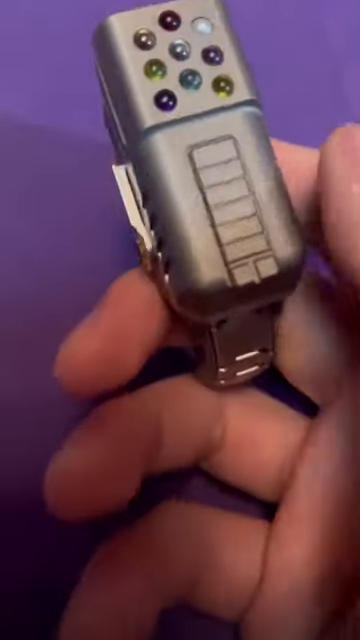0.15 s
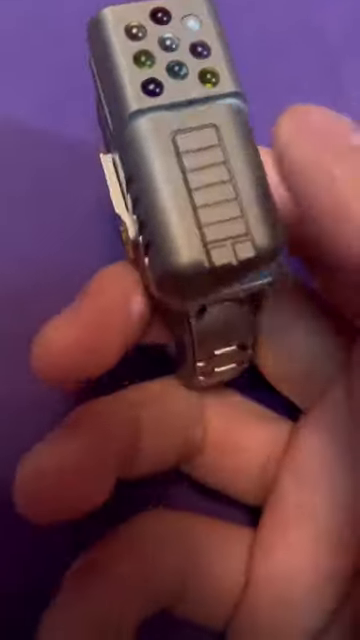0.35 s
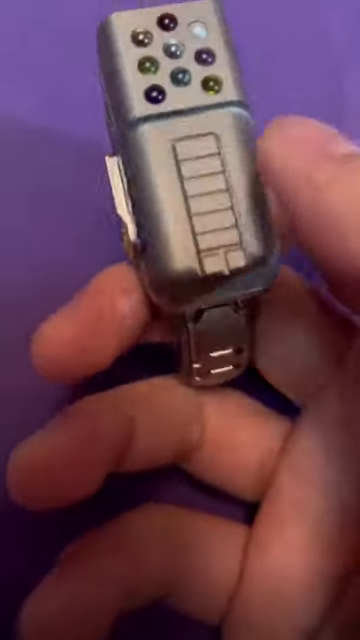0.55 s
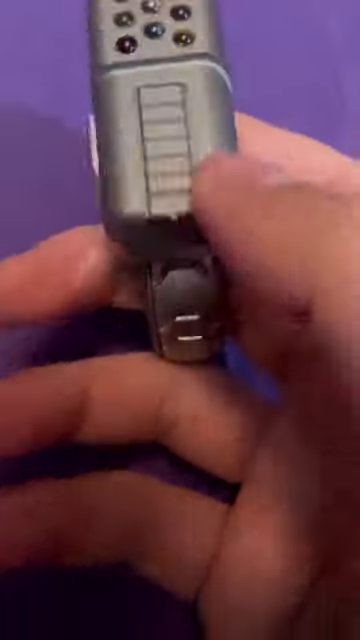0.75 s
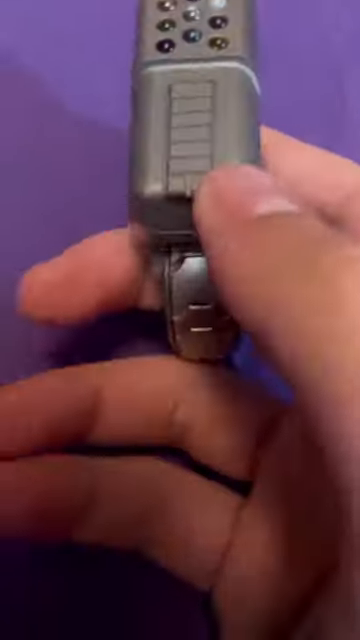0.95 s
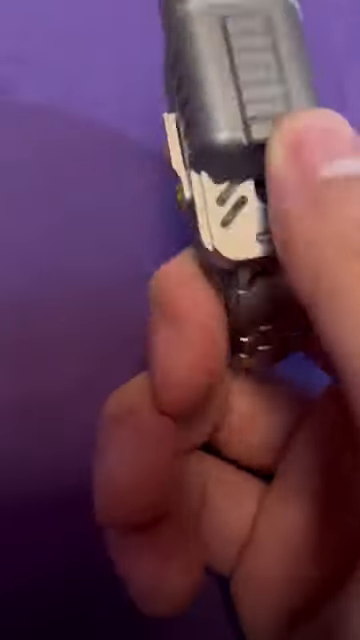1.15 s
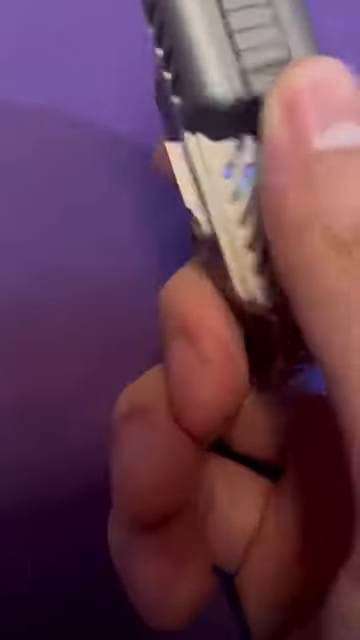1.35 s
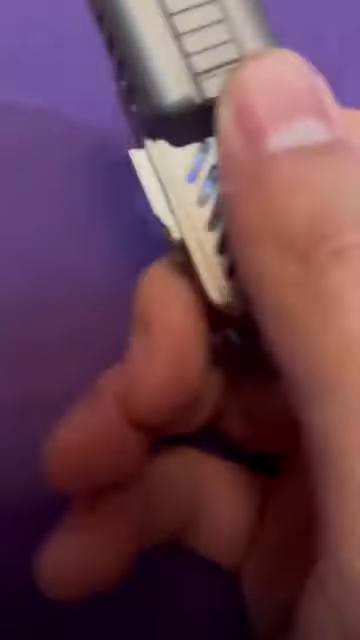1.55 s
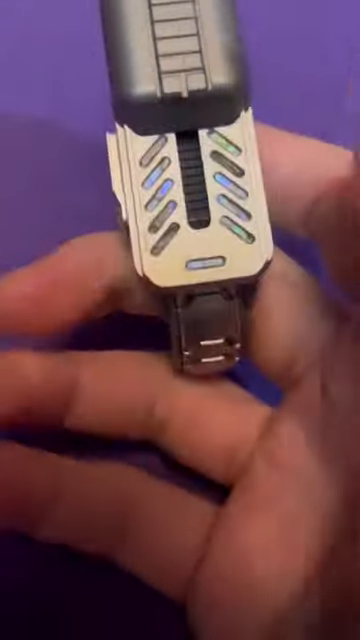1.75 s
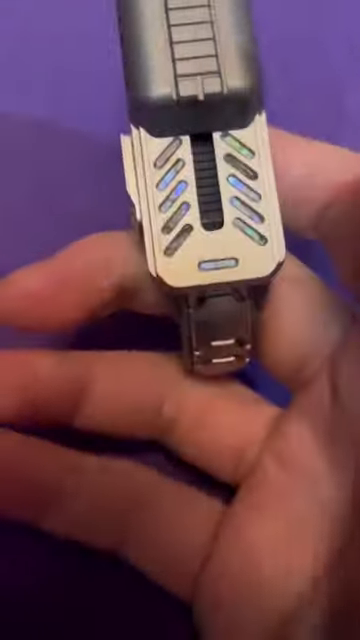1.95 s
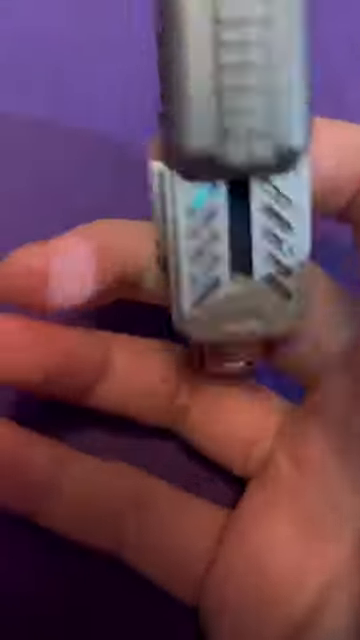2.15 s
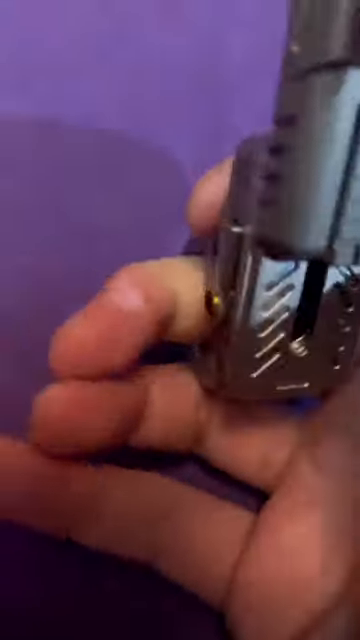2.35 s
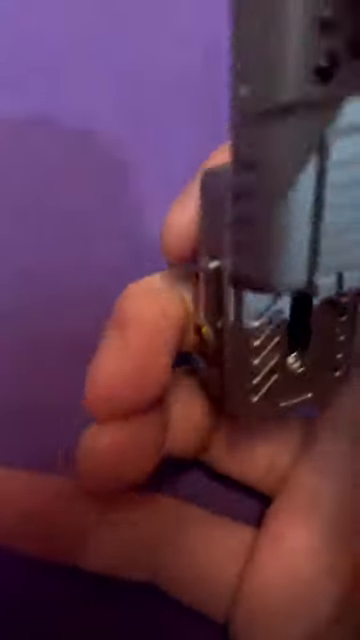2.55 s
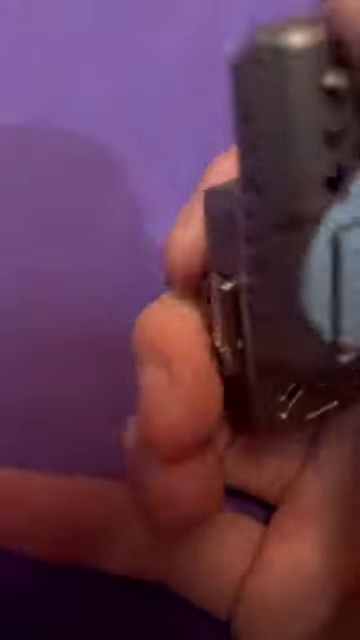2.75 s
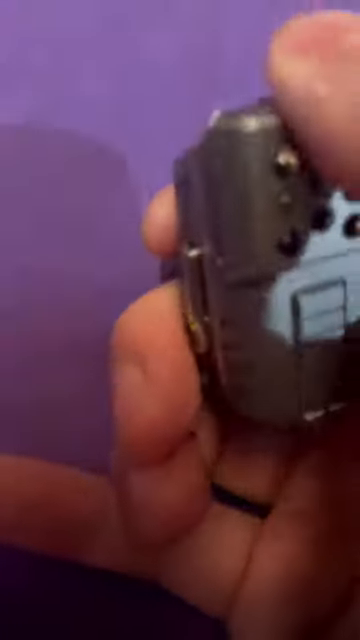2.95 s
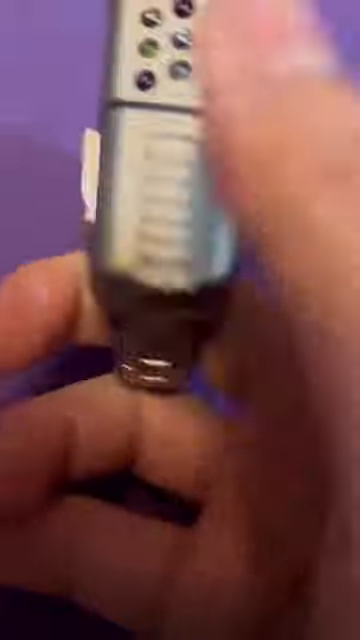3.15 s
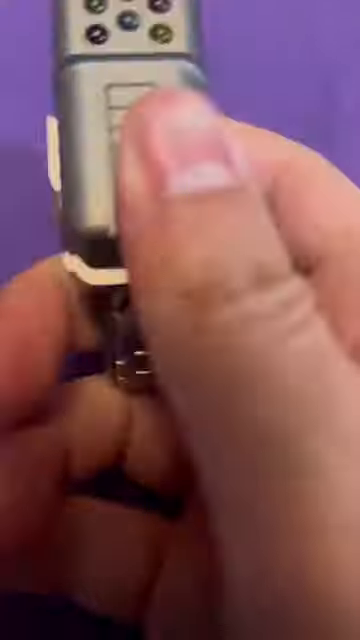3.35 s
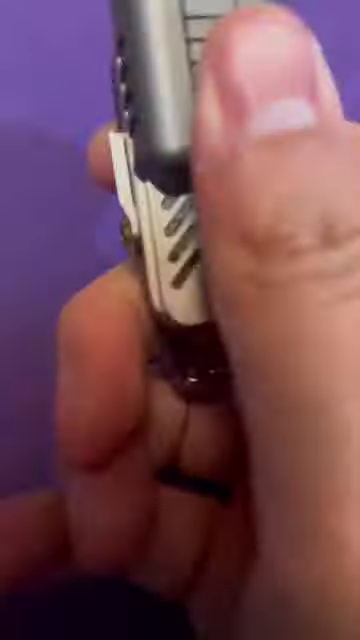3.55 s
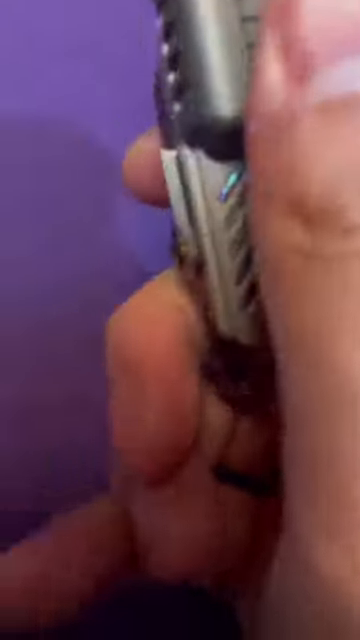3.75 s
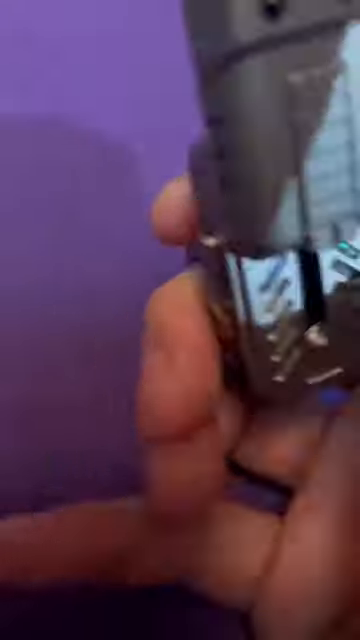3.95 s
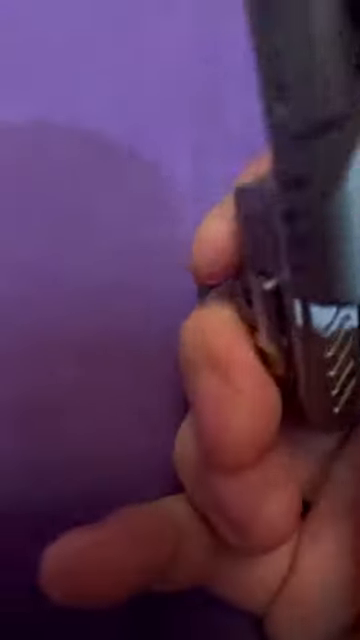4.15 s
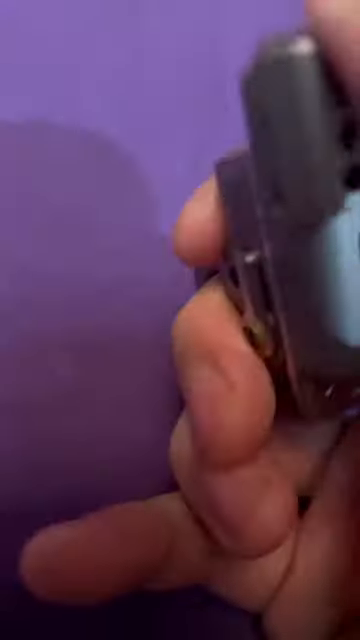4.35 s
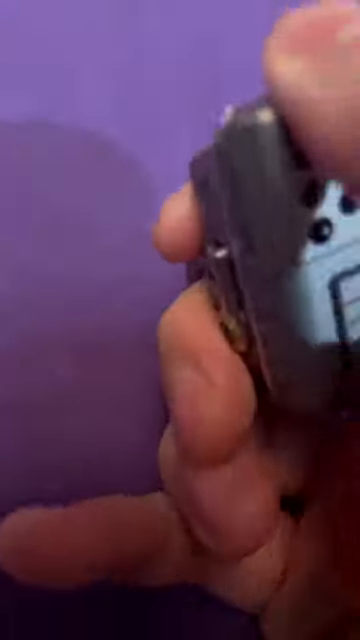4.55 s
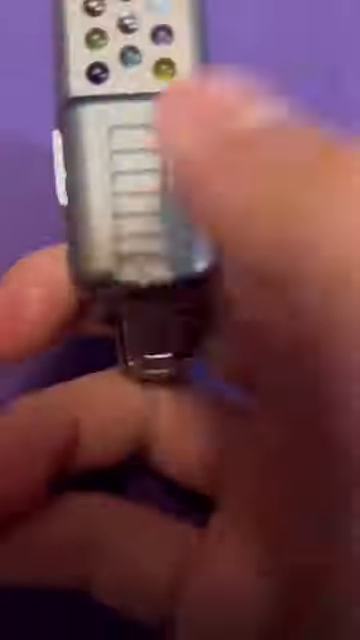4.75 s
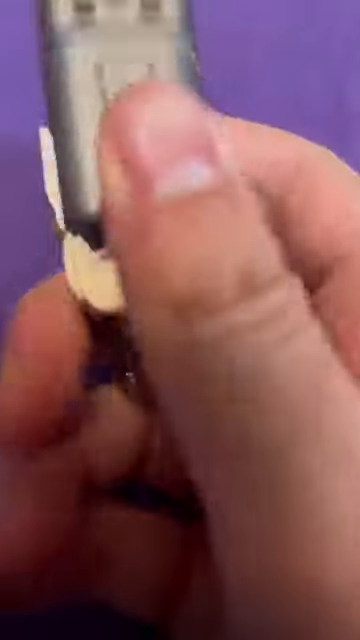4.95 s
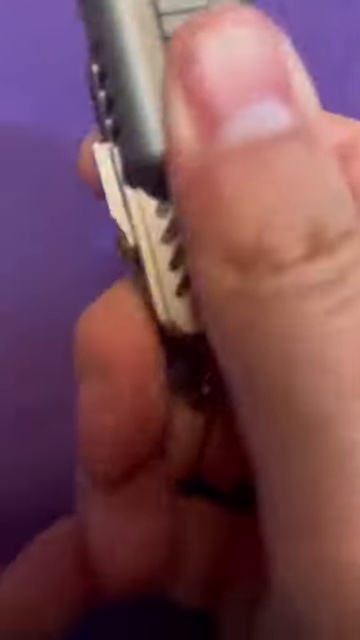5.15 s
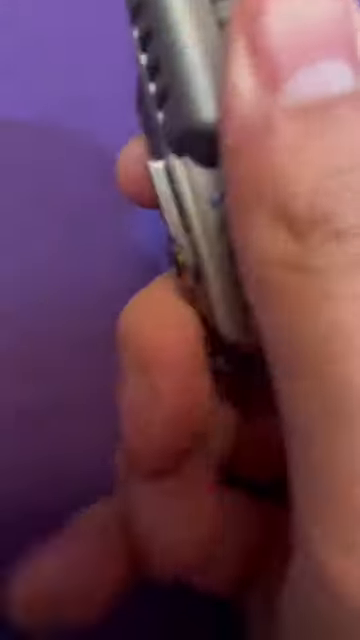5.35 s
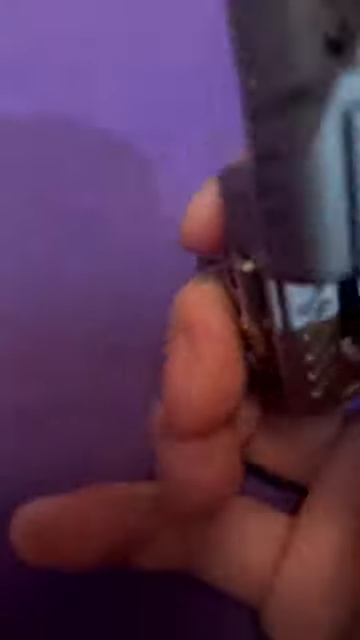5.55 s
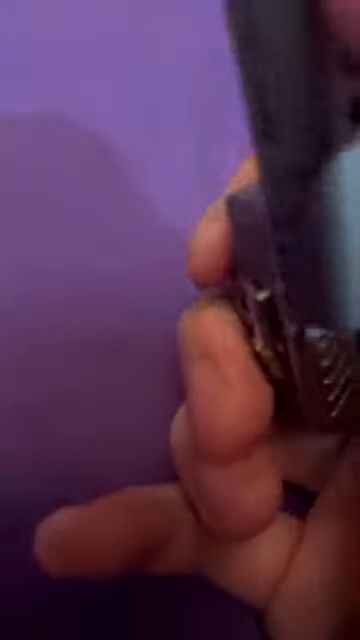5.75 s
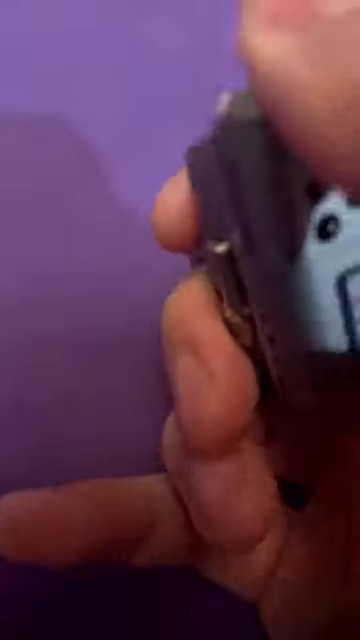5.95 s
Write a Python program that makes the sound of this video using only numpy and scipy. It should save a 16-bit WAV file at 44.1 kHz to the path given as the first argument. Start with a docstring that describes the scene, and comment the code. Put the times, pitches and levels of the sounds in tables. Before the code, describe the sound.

A quiet small room with very faint low airy noise and a wavering appliance hum; the close microphone catches only a barely audible skin rub at first. From about 1.3 s a loose tick leads into two sharp metal snaps almost together at 1.45 and 1.48, and a third at 1.67. Each is a tiny click, a few milliseconds of scrape, a bright hard crack and a duller clack, with a brief high metallic ring and low hand thud. The background dips near 2.2 s; only faint rubs and ticks follow until 3 s. Then triple snaps come at 3.06, 3.11 and 3.18; 3.71, 3.83 and 3.98; 4.55, 4.64 and 4.76; 5.28, 5.38 and 5.54. Lighter ticks scatter between, notably near 3.14, 4.41 and 5.21, with a soft low bump around 4.86. After the last snap, short ringing fades to near silence by 6 s.

```python
"""Metal fidget slider

A metal fidget slider is thumbed open and shut close by in a small, quiet room: five strokes of three notches.
At each notch filtered bursts of tiny impacts make a click, a scrape, a bright crack and a duller clack.
Fading sine waves ring the shell and cover, and low rumbles and bumps give the hand's jolts.
Loose parts tick, skin rubs as soft hiss, short noise tails answer as the room, and an appliance hums behind."""
import sys
import numpy as np
from scipy import signal
from scipy.fft import rfft, irfft, next_fast_len
from scipy.io import wavfile
from scipy.ndimage import map_coordinates

SR = 44100
rng = np.random.default_rng(int(sys.argv[2]) if len(sys.argv) > 2 else 0)


def dump_mix(stems):
    """Bounce the given channels to the path in sys.argv[1] as a 16-bit WAV at rate SR."""
    frames = np.atleast_2d(stems).T  # one column per channel
    limited = np.clip(frames, -1, 1)  # hard clip at full scale
    pcm = np.round(limited * 32767).astype(np.int16)
    wavfile.write(sys.argv[1], SR, pcm)


N = 264159

# Overall course of the background. Each row: time in seconds, guiding level in dB.
BACKGROUND_LEVEL = [(0, -62), (1.2, -61.5), (2.05, -64), (2.22, -70.5), (2.42, -69), (2.6, -63.5),
                    (4.5, -63), (5.99, -63.5)]
# Tone of the airy noise. Each row: frequency in Hz, relative strength in dB.
AIR_TONE = [(15, -51), (25, -17), (69, -8.5), (95, -4.5), (115, -5), (131, -19.5), (163, -11.5),
            (326, -12.5), (501, -7), (655, -24.5), (1760, -30.5), (4150, -38.5), (5420, -48),
            (10300, -50.5), (15000, -61.5)]
# Steady notes of the appliance. Each row: frequency in Hz, level in dB relative to the airy noise.
HUM_LINES = [(103, 0), (165, -10.5), (305, -9), (462, -6), (483, -11), (508, -5.5)]
# Skin sliding on the shell. Each row: middle in seconds, time from the middle until the swell falls to
# about a third in seconds, level before the swell in dB, centre of the hiss in Hz, its width in Hz.
SKIN_RUBS = [(0.48, .05, -82, 8500, 6000), (1.24, .085, -73, 6000, 3400), (1.27, .105, -70, 4200, 1000),
             (1.32, .14, -71, 2198, 900), (2.49, 0.036, -71.5, 9840, 4500), (2.6, .11, -75, 3400, 600),
             (2.867, 0.017, -68.5, 8450, 7150), (3.045, .01, -61, 8000, 7070),
             (3.41, .015, -65, 8980, 6820), (4.289, .02, -75, 9800, 3500), (4.49, .042, -72.5, 2300, 1530),
             (5.256, 0.01, -59, 2250, 887), (5.797, 0.12, -80.5, 9020, 7000)]
# Tone of the room's answer. Each row: frequency in Hz, relative strength in dB.
ECHO_TONE = [(200, -5), (1000, 11), (2500, 6), (5000, 2.5), (7200, -3), (9300, -0.5), (10300, -8.5),
             (15000, -1.5)]
# How long the room lingers. Each row: frequency in Hz, time to fall by 60 dB in seconds.
ROOM_DECAY = [(200, 0.31), (2000, 0.09), (6000, 0.22), (9500, 0.22), (10600, .22), (15000, 0.15)]
# Loose parts nudged by the fingers. Each row: start in seconds, crack level in dB, knock level in dB.
LOOSE_TICKS = [(1.3357, -42.5, -46.5), (1.3976, -57.5, -47.5), (1.585, -46, -47.5), (2.397, -80, -63),
               (2.716, -62.5, -82), (2.942, -64.5, -87), (2.9893, -46, -46.5), (3.1446, -35, -33),
               (3.3926, -64, -84), (3.6168, -64, -52), (3.6312, -50, -45.5), (3.6427, -45, -43.5),
               (3.7999, -52, -42), (3.847, -49.5, -43), (4.2025, -57, -46), (4.3784, -55, -72.5),
               (4.4119, -35, -42), (4.5636, -36.5, -41.5), (4.6466, -40, -41), (4.6879, -50.5, -49),
               (4.9822, -70, -54.5), (5.1871, -64, -50.5), (5.2082, -43.5, -32), (5.218, -46, -44),
               (5.9344, -66.5, -78.5)]
# Tone of two metal faces meeting. Each row: frequency in Hz, relative strength in dB.
CRACK_TONE = [(150, -17), (600, -16), (1100, -10.5), (1700, -2.5), (2650, -3.5), (3000, -4.5), (4800, 1.5),
              (6200, 3), (7300, 1), (10700, 2), (12400, 1), (15300, -4.5)]
# Damping of a light touch and of a hard blow. Each row: crack level in dB, knock width in Hz, ping width in Hz.
TOUCH_DAMPING = [(-48, 560, 1000), (-19.5, 850, 2000)]
# One snap per notch, three to a stroke. Each row: release, catch and landing in seconds,
# release, catch and landing levels in dB, extra knock and clunk in dB.
SNAP_EVENTS = [(1.4452, 1.451, 1.4618, -24, -18.5, -27, -6), (1.47, 1.4815, 1.487, -28.5, -19, -30, -4),
               (1.6594, 1.665, 1.6712, -33, -20.5, -24.5, -5.5),
               (3.0497, 3.0594, 3.0622, -28.5, -20.5, -26, 1),
               (3.106, 3.1123, 3.1142, -37.5, -19.5, -22, 0.5), (3.1689, 3.177, 3.1817, -31.5, -19, -20, 1),
               (3.704, 3.7106, 3.7207, -28.5, -19.5, -29, 2.5),
               (3.8212, 3.8275, 3.8312, -40, -21, -30, 1.5), (3.9712, 3.9777, 3.9838, -32.5, -21.5, -20, 2),
               (4.543, 4.551, 4.555, -34, -20, -28, -0.5), (4.629, 4.639, 4.641, -35, -20.5, -26.5, 0),
               (4.749, 4.7557, 4.7612, -36, -22, -18.5, -1), (5.274, 5.278, 5.2898, -26.5, -18, -25.5, 0.5),
               (5.371, 5.375, 5.384, -30.5, -19.5, -36, 0.5),
               (5.5382, 5.5435, 5.5493, -28.5, -18.5, -21, 0.5)]
# The notches in the order they are met, three outward and three homeward; the third and sixth are end stops.
# Each row: hollow knock in Hz, knock in the release, catch and landing relative to their cracks in dB,
# length of the scrape in seconds, scrape relative to the catch in dB, then the frame clunk, shell ring,
# cover ring and hand thud in dB.
NOTCH_SOUNDS = [(2320, -16, -10, 1.5, .006, -1.5, -43, -52, -41, -67),
                (2420, -11, -9, -3, .009, -3, -54, -51, -41, -64),
                (2430, -13, -19.5, -4, 0.0044, -6, -42, -37, -41, -56),
                (2100, 2, -11, -3, 0.0031, -1, -49, -48, -41, -58),
                (2150, -2.5, -6, -4.5, .003, 0, -52, -49, -45, -60),
                (2240, -3, -7, -4, 0.0039, -5, -54, -45, -56, -57)]
# Tone of the sliding cover. Each row: frequency in Hz, relative strength in dB.
SCRAPE_TONE = [(300, -29.5), (1000, -18.5), (2200, -3), (3300, -4), (5000, -12), (6200, 3.5), (7200, -8),
               (8800, 1), (10300, -3.5), (12000, -6.5), (15200, -7)]
# Lasting notes of the shell. Each row: frequency in Hz before a small random shift, relative level in dB
# before a random change, time to fall by 60 dB in seconds.
SHELL_NOTES = [(1590, -7, 0.055), (3310, -11.5, 0.14), (4450, -10, 0.15), (5610, -7.5, 0.055),
               (6800, -12, 0.16), (7770, -9.5, 0.14), (8900, -14, .14), (9200, -10, 0.11), (9550, -11, .17),
               (11600, -14.5, .09)]
# Tone of the jolted hand. Each row: frequency in Hz, relative strength in dB.
THUD_TONE = [(25, -18.5), (60, 1), (90, -5.5), (130, -13.5), (300, -20), (700, -42.5), (2000, -77.5)]
# Soft bumps of the hand. Each row: middle in seconds, time from the middle until the swell falls to
# about a third in seconds, level in dB, pitch in Hz.
HAND_BUMPS = [(1.729, 0.026, -49, 77.2), (3.018, 0.027, -48.5, 55.5), (4.862, 0.029, -39, 64.1),
              (4.984, 0.035, -51.5, 62.9), (5.633, 0.027, -54, 65.6)]

# How each contact sounds: treble tilt in dB, ping relative to the crack in dB, length of the chatter in seconds
TICK = dict(tilt_db=-11, ping_db=-2, chatter=.002)
RELEASE = dict(tilt_db=5.2, ping_db=0, chatter=.0021)
CATCH = dict(tilt_db=9, ping_db=-2.5, chatter=.0025)
LANDING = dict(tilt_db=-11.5, ping_db=-1, chatter=.0027)

# Every name ending in T60 is a time in seconds to change by 60 dB.
TICK_KNOCK_HZ = 2150
PING_HZ = 9000  # the plate's high ping, before a small random shift
FULL_RING_DB = -26  # a tick of this strength would ring the cover as hard as a landing does
COVER_HZ, COVER_T60 = 2664, .092  # the cover's bending note
LEAD_IN_DB, LEAD_IN_T60 = -25.5, .045  # lead-in level relative to the scrape's peak, and its rise
SWELL_DB_PER_S, SCRAPE_T60 = 700, 0.01  # the scrape's rise towards the catch and its fall after it
CLUNK_HZ, CLUNK_WIDTH_HZ, CLUNK_T60 = 1080, 550, .012  # the whole frame takes the landing
RATTLE_DB, RATTLE_T60 = -1, .13  # loose inner parts: level relative to the shell's ring, and decay
TOP_HZ = 15650  # the treble ends here


def amp(db):
    """Turn decibels into a gain."""
    return 10 ** (np.asarray(db) / 20)


def unit(x):
    """Scale a sound to an average (rms) level of 1."""
    return x / np.sqrt(np.mean(x ** 2) + 1e-20)


def burst(x):
    """Scale a short sound to the energy of 3 ms at an average (rms) level of 1."""
    return x * np.sqrt(.003 * SR / (np.sum(x ** 2) + 1e-20))


def along(points, hz):
    """Read a curve of (Hz, value) points, joined by straight lines over a log frequency axis."""
    f, value = np.transpose(points)
    return np.interp(np.log(hz + 1), np.log(f + 1), value)


def tone(points):
    """Make a gain curve in dB from a table of (Hz, dB) points."""
    return lambda hz: along(points, hz)


def resonance(centre_hz, width_hz):
    """Make the gain curve in dB of a steep-sided resonance."""
    def gain_db(f):
        distance = (f * f - centre_hz ** 2) / ((f + 1) * width_hz)
        return -20 * np.log10(1 + distance ** 2)
    return gain_db


def coloured(x, gain_db):
    """Filter a sound with a gain curve in dB, so that nothing is heard before its cause."""
    n = x.shape[-1]
    m = 2 * next_fast_len(n)
    gain = np.maximum(amp(gain_db(np.fft.rfftfreq(m, 1 / SR))), 1e-6)
    # folding the cepstrum onto its first half gives the filter its earliest possible response
    cepstrum = irfft(np.log(gain), m)
    cepstrum[1:m // 2] *= 2
    cepstrum[m // 2 + 1:] = 0
    response = np.exp(rfft(cepstrum))
    return irfft(rfft(x, m) * response, m)[..., :n]


def wobble(rate):
    """Draw a smooth random curve through `rate` random points a second."""
    points = rng.standard_normal(int(N * rate / SR) + 4)
    return map_coordinates(points, [np.arange(N) * rate / SR])


def grit(envelope, spiky_db):
    """Make a hail of tiny impacts of uneven size that follows an envelope."""
    sign, size = rng.standard_normal((2, len(envelope)))
    return envelope * sign * amp(spiky_db * size)


def add(track, s, x):
    """Mix x into the track at s seconds."""
    i = max(round(s * SR), 0)
    track[i:i + len(x)] += x[:max(N - i, 0)]


def hum_line(hz, t):
    """One note of the appliance, wavering in strength and phase."""
    strength = amp(3 * wobble(7))
    return strength * np.sin(2 * np.pi * hz * t + 1.2 * wobble(10))


def background():
    """Low airy noise and the wavering hum of an appliance; both sink for a moment."""
    t = np.arange(N) / SR
    level_db = np.interp(t, *np.transpose(BACKGROUND_LEVEL))
    usual_db = np.median(level_db)
    swing_db = level_db - usual_db

    mid, side = unit(coloured(rng.standard_normal((2, N)), tone(AIR_TONE)))
    air = np.array([mid + amp(-28.5) * side, mid - amp(-27) * side])
    body = signal.sosfiltfilt(signal.butter(2, 700, fs=SR, output="sos"), air)
    hiss = air - body
    hum = sum(amp(db) * hum_line(hz, t) for hz, db in HUM_LINES)

    # the low body and hum swing further than the faint hiss above them
    low = amp(1.6 * swing_db) * (amp(2.0) * body + hum)
    high = amp(3.5 + 0.45 * swing_db) * hiss
    return amp(usual_db) * (low + high)


def rubs():
    """Fingers brush the shell in soft swells of hiss; the skin catches and slips as it goes."""
    out = np.zeros(N)
    t = np.arange(SR // 2) / SR - 1 / 4  # zero at the middle of the rub
    for s, length, db, hz, width_hz in SKIN_RUBS:
        catching = amp(2.5 * wobble(300)[:len(t)])
        hiss = unit(coloured(grit(catching, spiky_db=2.5), resonance(hz, width_hz)))
        swell = np.exp(-(t / length) ** 2)
        add(out, s + t[0], amp(db) * hiss * swell)
    return out


def widen(x, side_db):
    """Widen the toy slightly: a faint copy, 0.4 ms late, is added left and subtracted right."""
    late_copy = amp(side_db) * np.pad(x, (round(.0004 * SR), 0))[:N]
    return np.array([x + late_copy, x - late_copy])


def room(x):
    """The room answers with a short blurred tail of fading noise, drawn at random for every 1/8 s block."""
    out, span = np.zeros((2, N + SR)), SR // 8
    x = np.pad(x, (round(0.0065 * SR), 0))  # the answer starts 6.5 ms late
    for i in range(0, N, span):
        hz, t, noise = signal.stft(rng.standard_normal((2, SR // 2)), SR, nperseg=256)
        fall_db = 60 * t / along(ROOM_DECAY, hz)[:, None]
        decay = amp(along(ECHO_TONE, hz)[:, None] - fall_db)
        mid, side = signal.istft(noise * decay, SR, nperseg=256)[1]
        tail = np.array([mid + amp(-20) * side, mid - amp(-20) * side]) / np.linalg.norm(mid)
        wet = signal.fftconvolve(x[None, i:i + span], tail, axes=1)
        out[:, i:i + wet.shape[1]] += wet
    return out[:, :N]


def contact(crack_db, knock_db, knock_hz, tilt_db, ping_db, chatter):
    """Two faces chatter together: a wide crack, the housing's hollow knock and the plate's high ping."""
    t = np.arange(SR // 25) / SR
    # the faces meet edge first and buzz for a moment, then the gripping hand damps them
    onset = 1 - np.exp(-t / 0.00096)
    buzz = np.exp(-(t / chatter) ** 1.6)
    force = onset * (buzz + amp(-22.5 - 60 * t / .03))

    # a light touch leaves the parts freer to ring than a hard one
    firmness, knock_widths, ping_widths = np.transpose(TOUCH_DAMPING)
    knock_width = np.interp(crack_db, firmness, knock_widths)
    ping_width = np.interp(crack_db, firmness, ping_widths)
    ping_hz = PING_HZ * (1 + 0.033 * rng.standard_normal())

    def crack_tone(f):
        tilt = along([(6000, -0.43), (12000, 0.43)], f)
        return along(CRACK_TONE, f) + tilt_db * tilt

    crack = burst(coloured(grit(force, spiky_db=6.5), crack_tone))
    knock = burst(coloured(grit(force, spiky_db=3.0), resonance(knock_hz, knock_width)))
    ping = burst(coloured(grit(force, spiky_db=5.5), resonance(ping_hz, ping_width)))
    return amp(crack_db) * (crack + amp(ping_db) * ping) + amp(knock_db) * knock


def cover_ring(t):
    """The free end of the cover rings briefly in its lowest bending note."""
    return amp(-60 * t / COVER_T60) * np.sin(2 * np.pi * COVER_HZ * t)


def ticks():
    """Light contacts from the play between the parts; the cover rings as freely as the notch it rests in allows."""
    out, t = np.zeros(N), np.arange(SR // 4) / SR
    landings = [snap[2] for snap in SNAP_EVENTS]
    for s, crack_db, knock_db in LOOSE_TICKS:
        resting = np.searchsorted(landings, s) - 1  # the latest landing
        *_, cover_db, _ = NOTCH_SOUNDS[resting % len(NOTCH_SOUNDS)]
        add(out, s, contact(crack_db, knock_db, TICK_KNOCK_HZ, **TICK))
        add(out, s, amp(cover_db + crack_db - FULL_RING_DB) * cover_ring(t))
    return out


def scrape(u, run_up, length):
    """A faint lead-in swells up to the release, then the scrape grows towards the catch at u = 0."""
    lead_in = amp(LEAD_IN_DB + 60 * np.minimum(u + run_up, 0) / LEAD_IN_T60)
    rise_db = SWELL_DB_PER_S * np.minimum(u, 0)
    fall_db = 60 * np.maximum(u, 0) / SCRAPE_T60
    travel = amp(rise_db - fall_db)
    loudness = np.where(u < -length, lead_in, travel)
    return burst(coloured(grit(loudness, spiky_db=4.5), tone(SCRAPE_TONE)))


def ringing(t, blur_hz):
    """The shell's notes; strength and pitch vary at random per landing, and a wandering phase roughens them."""
    hz, db, t60 = np.transpose(SHELL_NOTES)[:, :, None]
    strength, detune = rng.standard_normal((2, len(SHELL_NOTES), 1))
    steps = rng.standard_normal((len(SHELL_NOTES), len(t)))
    drift = np.cumsum(steps, axis=1) * np.sqrt(2 * np.pi * blur_hz / SR)
    fading = amp(db + 1.4 * strength - 60 * t / t60)
    notes = np.sin(2 * np.pi * hz * (1 + 0.0078 * detune) * t + drift)
    return np.sum(fading * notes, axis=0)


def jangle(t):
    """The shell's ring with the dense rattle of the loose parts inside it."""
    rattle = burst(coloured(grit(amp(-60 * t / RATTLE_T60), spiky_db=3), tone(CRACK_TONE)))
    return ringing(t, blur_hz=45) + amp(RATTLE_DB) * rattle


def frame_clunk(t):
    """The whole frame takes the landing as a short, low resonance."""
    jolt = grit(amp(-60 * t / CLUNK_T60), spiky_db=3)
    return burst(coloured(jolt, resonance(CLUNK_HZ, CLUNK_WIDTH_HZ)))


def snaps():
    """At each notch the cover clicks loose, scrapes as magnets pull it in, catches, and lands to ring the metal."""
    out, t = np.zeros(N), np.arange(SR // 4) / SR
    lead = .04  # seconds of sound made before the catch
    for i, snap in enumerate(SNAP_EVENTS):
        release, catch, landing, release_db, catch_db, landing_db, extra_db = snap
        (knock_hz, release_knock_db, catch_knock_db, landing_knock_db,
         length, scrape_db, clunk_db, shell_db, cover_db, _) = NOTCH_SOUNDS[i % len(NOTCH_SOUNDS)]
        add(out, release, contact(release_db, release_db + release_knock_db + extra_db, knock_hz, **RELEASE))
        add(out, catch - lead, amp(catch_db + scrape_db) * scrape(t - lead, catch - release, length))
        add(out, catch, contact(catch_db, catch_db + catch_knock_db + extra_db, knock_hz, **CATCH))
        add(out, landing, contact(landing_db, landing_db + landing_knock_db + extra_db, knock_hz, **LANDING))
        add(out, landing, amp(clunk_db + extra_db) * frame_clunk(t))
        add(out, landing, amp(shell_db) * jangle(t))
        add(out, landing, amp(cover_db) * cover_ring(t))
    return out


def hand():
    """The hand takes each snap as a dull thud that lingers, and bumps softly as it shifts grip."""
    out, t = np.zeros(N), np.arange(SR // 2) / SR
    for i, (_, _, landing, *_) in enumerate(SNAP_EVENTS):
        thud_db = NOTCH_SOUNDS[i % len(NOTCH_SOUNDS)][-1]
        # a slow fade with a brief, stronger start
        jolt = grit(amp(-60 * t / 0.22) + amp(4 - 60 * t / .02), spiky_db=1.5)
        add(out, landing, amp(thud_db) * unit(coloured(jolt, tone(THUD_TONE))))
    for s, length, db, hz in HAND_BUMPS:
        u = np.arange(N) / SR - s
        swell = np.exp(-(u / length) ** 2)
        out += amp(db) * np.sqrt(2) * swell * np.sin(2 * np.pi * hz * u)
    return out


def scene():
    """The toy close up and central, its room behind it."""
    behind = background()
    toy = rubs() + ticks() + snaps()
    return widen(toy, side_db=-29.5) + amp(-24.5) * room(toy) + hand() + behind


def record(dry):
    """The recorder lets the sound fall off steeply above its top frequency."""
    m = next_fast_len(N + SR // 2)
    passband = 1 / np.sqrt(1 + (np.fft.rfftfreq(m, 1 / SR) / TOP_HZ) ** 200)
    return irfft(rfft(dry, m) * passband, m)[:, :N]


dry = scene()
out = record(dry)
dump_mix(out)
```